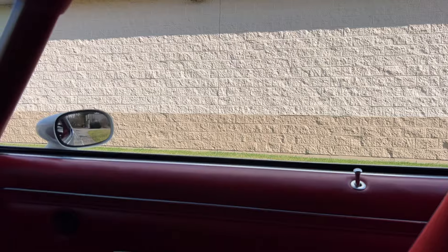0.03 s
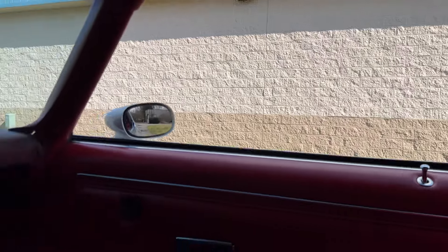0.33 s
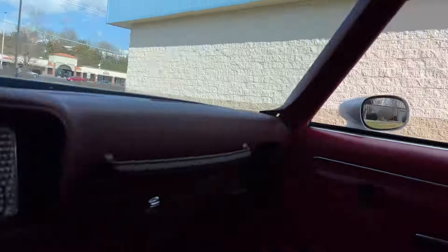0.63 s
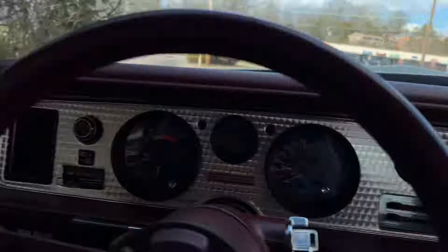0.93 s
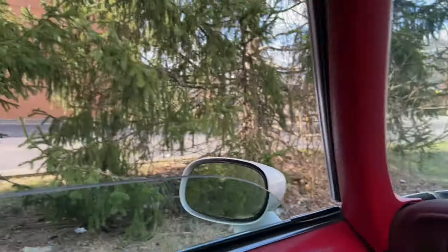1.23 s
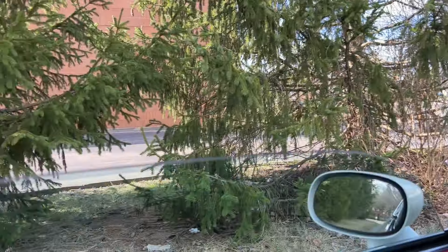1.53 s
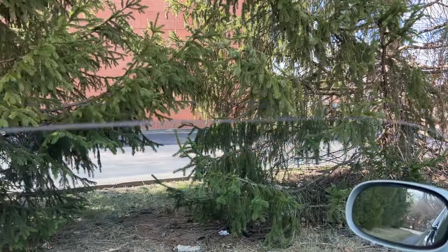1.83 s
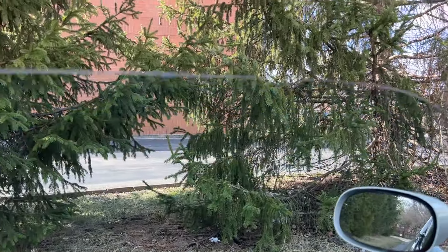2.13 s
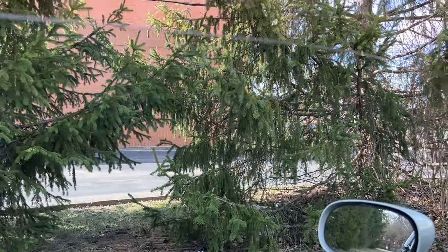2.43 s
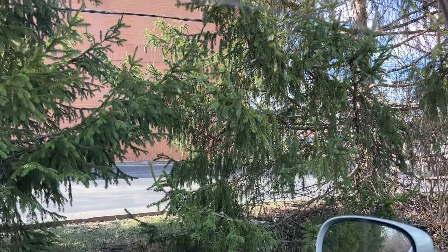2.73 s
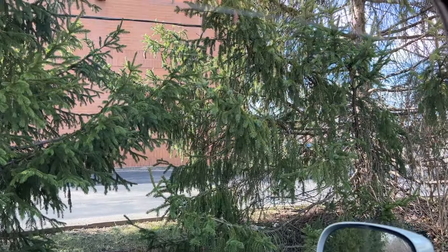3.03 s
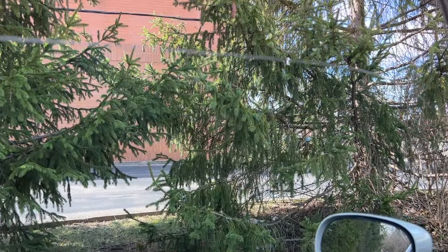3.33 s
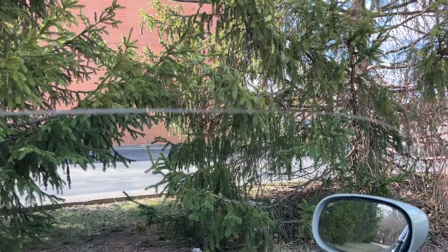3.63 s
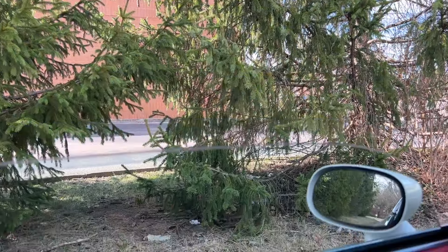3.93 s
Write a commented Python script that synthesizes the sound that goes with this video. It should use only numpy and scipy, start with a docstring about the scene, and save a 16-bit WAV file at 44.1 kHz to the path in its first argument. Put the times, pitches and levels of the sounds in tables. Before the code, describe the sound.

A car's power window motor whirrs twice, with a switch clack and rumbling engine idle.

```python
"""A V8 idles with a lumpy burble, heard inside the parked car. A window motor stops, a sleeve rustles, a switch
clicks and the motor whirrs the glass up, slowing under load. After a pause the switch clacks and the glass runs
down. The firings boom in the cabin and shake the trim; motor hum and gear rasp ring through the door; the glass
hisses in its felt channel and thin tones glide, the motor's whine swelling among them."""
import sys
import numpy as np
from scipy import signal
from scipy.fft import rfft, irfft, next_fast_len
from scipy.io import wavfile
from scipy.ndimage import map_coordinates

SR = 44100
rng = np.random.default_rng(int(sys.argv[2]) if len(sys.argv) > 2 else 0)


def wav_record(signal):
    """Record a signal, one row per channel, as 16-bit PCM in the file named by sys.argv[1]."""
    frames = np.transpose(np.atleast_2d(signal))
    bounded = np.clip(frames, -1, 1)
    # unit amplitude maps onto the largest positive 16-bit level
    quanta = np.round(bounded * 32767).astype(np.int16)
    wavfile.write(sys.argv[1], SR, quanta)


N = 176400
CYLINDERS = 8


def amp(db):
    """Decibels to gain."""
    return 10 ** (np.asarray(db) / 20)


def unit(x):
    """Scale to rms 1."""
    return x / np.sqrt(np.mean(x ** 2) + 1e-20)


def clock():
    """Sample times in seconds."""
    return np.arange(N) / SR


def curve(rows):
    """(s, value) points joined by lines."""
    return np.interp(clock(), *np.transpose(rows))


def along(points, hz):
    """(Hz, value) points joined on a log axis."""
    knots_hz, values = np.transpose(points)
    return np.interp(np.log(hz + 1), np.log(knots_hz + 1), values)


def wobble(rate_hz):
    """Smooth random curve, rate_hz knots a second."""
    return map_coordinates(rng.standard_normal(int(N * rate_hz / SR) + 4), [clock() * rate_hz])


def filtered(x, response):
    """Apply a gain given as a function of Hz."""
    size = next_fast_len(N + SR // 4)
    return irfft(rfft(x, size) * response(np.fft.rfftfreq(size, 1 / SR)), size)[..., :N]


def pan(db):
    """Stereo gains, left louder by db."""
    return amp(np.array([[db], [-db]]) / 2)


def spread(pair, colour):
    """Two unrelated signals, coloured (dB of Hz) and blended to cabin stereo of rms 1."""
    # Each row: frequency in Hz, left-right correlation.
    likeness = [(100, 0.1), (250, 0.74), (500, 0.38), (1500, 0.15), (4000, 0.15), (8000, 0.1), (12000, 0)]
    angle = lambda hz: np.arccos(np.clip(along(likeness, hz), -1, 1)) / 2
    mid, side = filtered(pair, lambda hz: amp(colour(hz)) * [np.cos(angle(hz)), np.sin(angle(hz))])
    return unit(np.array([mid + side, mid - side]))


def hiss(t60_s=.09):
    """Stereo noise: part diffuse, part one source through short cabin reflections."""
    echoes = rng.standard_normal((2, SR // 10)) * amp(-60 * np.arange(SR // 10) / SR / t60_s)
    reflected = signal.fftconvolve(rng.standard_normal((1, N)), echoes, axes=1)[:, :N]
    return unit(reflected) + rng.standard_normal((2, N))


def noise(spectrum):
    """Stereo noise of rms 1, shaped by (Hz, dB) points."""
    return spread(hiss(), lambda hz: along(spectrum, hz))


def partials(turns, orders, wander, rate_hz, lag_turns=0, depth_db=0, smear_rad=0):
    """Harmonics of a rotation, drifting in level and phase; their joint swell comes lag_turns late."""
    middle = round(orders[len(orders) // 2 - 1][0])
    out = 0
    for order, db in orders:
        away = round(order) - middle
        phase = 2 * np.pi * (round(order) * turns - away * lag_turns) + smear_rad * away ** 2
        phase += wander * wobble(rate_hz)
        gain = amp(db + depth_db * (away != 0)) * (1 + wander * wobble(rate_hz) / 2)
        out = out + gain * np.cos(phase)
    return np.sqrt(2) * out


def cabin_air(level_db=-29):
    """Steady cabin air and engine hiss."""
    # Each row: frequency in Hz, relative density in dB.
    spectrum = [(20, -6), (45, -2), (100, 10), (200, -3), (400, -18.5), (700, -23.5), (1200, -30.5),
                (2500, -37), (3600, -45.5), (7000, -47), (9000, -55), (15000, -70.5)]
    return amp(level_db) * noise(spectrum) * pan(2)


def exhaust_boom(cycles):
    """The exhaust booms in the cabin, strongest at the firing rate."""
    # Each row: time in seconds, level in dB.
    levels = [(0.03, -11.5), (1.64, -13.5), (1.68, -15.5), (1.73, -13), (2.56, -13.5), (3.32, -17),
              (3.42, -14), (3.56, -18.5), (3.62, -13), (3.97, -14.5)]
    # Each row: multiple of the cycle rate, relative level in dB.
    orders = [(5, -35.5), (6, -24), (7, -8), (8, 9), (9, -22), (10, -30.5), (11, -8), (12, -30),
              (13, -19.5), (14, -47), (15, -32), (16, -5.5)]
    return unit(partials(cycles, orders, wander=.031, rate_hz=9.6)) * amp(curve(levels)) * pan(-1.3)


def exhaust_burble(cycles):
    """Uneven exhaust beats swell once a cycle; unequal delays of the partials smear them."""
    # Each row: time in seconds, level in dB, place of the swell in cycles, swell depth in dB.
    swells = [(0, -23, 0, -2.5), (.7, -26.5, 0.4, 0.5), (1.25, -17.5, 0.03, 1.5), (1.8, -15, 0.11, 0),
              (2.15, -20.5, .11, 2.5), (2.75, -17, .06, -0.5), (3.15, -18, 0, -8.5), (3.55, -19, .05, -0.5),
              (3.85, -15, 0.07, -1)]
    # Each row: multiple of the cycle rate, relative level in dB.
    orders = [(18, -15), (19, 3), (20, 1), (21, 7), (22, -15), (23, -12)]
    level_db, lag_turns, depth_db = (curve(np.array(swells)[:, [0, column]]) for column in (1, 2, 3))
    beats = partials(cycles, orders, wander=.51, rate_hz=6.1,
                     lag_turns=lag_turns, depth_db=depth_db, smear_rad=.32)
    return unit(beats) * amp(level_db)


def trim_rattle(firings, scatter=.58, roughness=.93, decay_s=.05):
    """Each firing kicks the trim into ringing, each cylinder with its own strength."""
    # Each row: time in seconds, level in dB.
    levels = [(0, -30.5), (.75, -31.5), (1.1, -30), (2, -29), (2.7, -32.5), (3.4, -32.5), (4, -31)]
    # Each row: frequency in Hz, relative density in dB.
    spectrum = [(60, -39.5), (150, -2), (203, 0), (226, -9), (262, -4), (285, -6), (308, -2), (365, -16),
                (430, -18), (520, -30.5), (615, -28.5), (695, -18.5), (740, -40), (790, -22.5),
                (860, -41.5), (2000, -67)]
    onsets = np.flatnonzero(np.diff(np.floor(firings)))
    strengths = rng.standard_normal((CYLINDERS, 2))[np.arange(len(onsets)) % CYLINDERS]
    kicks = np.zeros((2, N))
    kicks[:, onsets] = (strengths + scatter * rng.standard_normal((len(onsets), 2))).T
    ringing = rng.standard_normal((1, SR // 5)) * np.exp(-np.arange(SR // 5) / SR / decay_s)
    shaken = unit(signal.fftconvolve(kicks, ringing, axes=1)[:, :N]) + roughness * unit(hiss())
    return spread(shaken, lambda hz: along(spectrum, hz)) * amp(curve(levels))


def engine(first_firing_s=.0051):
    """Idling V8: eight firings a cycle drive exhaust and trim."""
    # Each row: time in seconds, firing rate in Hz.
    idle = [(0.0, 58.81), (0.7, 59.58), (0.95, 58.39), (1.6, 58.53), (2.1, 57.27), (2.7, 58.21),
            (3.05, 60.76), (3.5, 59.89), (4.0, 58.25)]
    firings = np.cumsum(curve(idle)) / SR - first_firing_s * idle[0][1]
    cycles = firings / CYLINDERS
    return exhaust_boom(cycles) + exhaust_burble(cycles) + trim_rattle(firings)


def sleeve(grain_db=.5):
    """A hand reaching for the switch rubs the hollow trim; the sleeve swishes above it."""
    # Each row: centre in seconds, Gaussian width in seconds, rub level in dB, swish level in dB.
    brushes = [(0.601, 0.018, -41.5, -53.5), (.648, 0.019, -39, -49.5), (.708, 0.013, -39, -48.5),
               (0.741, .016, -40.5, -55.5), (0.882, .1, -52, -53.5), (3.066, 0.023, -39, -57.5),
               (3.113, .012, -38, -46.5), (3.142, 0.016, -34.5, -52.5)]
    # Each row of both: frequency in Hz, relative density in dB.
    rub_spectrum = [(150, -6), (300, 3.5), (470, 2), (620, -7), (760, -2), (900, -4), (1600, -10),
                    (2400, -20.5), (5000, -39.5), (15000, -66.5)]
    swish_spectrum = [(500, -10), (1500, 2), (2800, 0), (4500, -9), (8000, -12.5), (10000, -30),
                      (15000, -30)]
    rub_gain, swish_gain = sum(np.outer(amp(db), np.exp(-.5 * ((clock() - centre_s) / width_s) ** 2))
                               for centre_s, width_s, *db in brushes)
    rub = rub_gain * unit(noise(rub_spectrum) * amp(grain_db * wobble(200)))
    swish = swish_gain * unit(noise(swish_spectrum) * amp(grain_db * wobble(400)))
    return (rub + swish) * pan(2.5)


def clicks(rise_s=.00022, skirt_db=30):
    """Switch clicks and gear knocks: bursts of rattle that die fast in the padded cabin."""
    # Each row: start in seconds, level in dB, centre in Hz, width in octaves, T60 in seconds.
    hits = [(0.696, -57, 2800, 0.93, 0.049), (0.937, -38.5, 5720, .65, 0.019),
            (1.485, -47.5, 5030, 0.72, .02), (2.715, -46.5, 3500, 1.1, 0.019),
            (2.7588, -42, 2600, 1.5, 0.015), (3.062, -40, 1870, 0.32, .03), (3.0638, -48, 6320, .5, .014),
            (3.1588, -33, 3900, .7, 0.068), (3.16, -28, 1215, 1.6, 0.057), (3.17, -25.5, 695, 1.4, 0.031),
            (3.165, -34, 1725, 0.11, 0.15), (3.184, -19.5, 478, 1.17, 0.062),
            (3.184, -44.5, 4960, 0.72, 0.055), (3.2094, -46.5, 13250, 0.23, 0.033),
            (3.2094, -40, 5610, 0.74, 0.033)]
    out = np.zeros((2, N))
    for start_s, db, centre_hz, octaves, t60_s in hits:
        age_s = np.maximum(clock() - start_s, 0)
        band_db = lambda hz: -skirt_db * np.log10(1 + (np.log2((hz + 1) / centre_hz) / octaves) ** 4)
        burst = spread(rng.standard_normal((2, N)), band_db)
        out += burst * amp(db - 60 * age_s / t60_s) * (1 - np.exp(-age_s / rise_s))
    return out * pan(-.5)


def gliding_whistles(rough_rad_per_hz=.00035, flutter_db=1.1):
    """Thin tones sing in short, rough glides while the motor runs; those near 3.1-3.5 kHz are the motor's
    seventh slot harmonic swelling through the door's resonances."""
    # Each row: start in seconds, length in seconds, first and last pitch in Hz, level in dB.
    glides = [(.9, .08, 1605, 1598, -56), (.94, .2, 3350, 3310, -58), (1.09, .31, 3465, 3420, -62),
              (1.41, .16, 3250, 3215, -62), (1.58, .3, 3135, 3060, -63), (1.24, .31, 1602, 1602, -53),
              (1.1, .3, 8280, 8380, -68), (3.28, .28, 7880, 7910, -64), (3.52, .24, 5150, 4620, -64),
              (3.73, .18, 3080, 3180, -61)]
    out = np.zeros(N)
    for start_s, length_s, from_hz, to_hz, db in glides:
        progress = np.clip((clock() - start_s) / length_s, 0, 1)
        phase = 2 * np.pi * np.cumsum(from_hz + (to_hz - from_hz) * progress) / SR
        phase += rough_rad_per_hz * from_hz * wobble(110) + wobble(45)
        envelope = amp(db) * np.sqrt(2 * np.abs(np.sin(np.pi * progress)))
        out += envelope * np.sin(phase) * amp(flutter_db * wobble(30))
    return out


def felt_hiss():
    """Glass sliding in its felt channel."""
    # Each row: frequency in Hz, relative density in dB.
    spectrum = [(1000, -21.5), (3500, 7), (6000, -10), (8400, 6), (9800, -19), (12000, -3.5), (14500, -7),
                (15700, -21.5)]
    # Each row: time in seconds, base level in dB.
    levels = [(0, -62), (.95, -51.5), (1.3, -56.5), (1.7, -62), (2.5, -62.5), (2.72, -65.5), (3.3, -60.5),
              (4, -60)]
    return noise(spectrum) * amp(curve(levels))


def door_lift_db(hz, way):
    """Boost from the door's resonances; way 0 is glass going up, 1 down."""
    # Each row: centre in Hz, width in Hz, boost going up in dB, boost going down in dB.
    modes = [(432, 14, 8.6, 2), (672, 17, 8.1, 10.5), (787, 18, 9, -1), (965, 55, 11, 8.5),
             (1000, 33, 5.6, 2.5), (1115, 50, 1.1, 3.5), (1186, 45, 7, 6.5), (1390, 55, 2, 5.5),
             (1714, 20, 10, 12), (1890, 52, 3.3, 10.5), (2200, 44, 4.6, 4.5), (2557, 120, 7.4, 11.5),
             (3270, 120, 5.6, 7.5), (5160, 380, 4.8, 5), (7330, 90, 2, 3)]
    return sum(db[way] / (1 + (2 * (hz - centre_hz) / width_hz) ** 2)
               for centre_hz, width_hz, *db in modes)


def gear_rasp(turns, slots, slot_depth=.29, shaft_depth=.084, grit_db=.5):
    """Gear noise through the door, pulsing per slot and per turn. Returns up, down."""
    # Each row: frequency in Hz, relative density in dB.
    spectrum = [(150, -12.5), (400, 3.5), (800, -4.5), (1150, -4.5), (1500, -7.5), (2200, -9.5),
                (2900, -17.5), (4200, -20), (6500, -20.5), (8500, -27), (10000, -44.5), (15000, -39.5)]
    slot_pulse = 1 + slot_depth * np.cos(2 * np.pi * slots * turns)
    shaft_pulse = 1 + shaft_depth * np.cos(2 * np.pi * turns)
    rasp = slot_pulse * shaft_pulse * amp(grit_db * wobble(150)) * hiss()
    return [spread(rasp, lambda hz: along(spectrum, hz) + door_lift_db(hz, way)) for way in (0, 1)]


def motor_hum(turns, slots, door_share=.57):
    """Slot-rate harmonics, lifted as they glide across the door's resonances. Returns up, down."""
    # Each row: multiple of the slot rate, base level in dB.
    orders = [(1, -50.5), (2, -59), (3, -61), (4, -62), (5, -66.5), (6, -67), (7, -70)]
    hum = np.array([partials(slots * turns, orders, wander=.32, rate_hz=38) for side in range(2)])
    return [filtered(hum, lambda hz: amp(door_share * door_lift_db(hz, way))) for way in (0, 1)]


def window(slots=6, fade_s=.026, lowering_gain=.68):
    """The motor drives the glass in three runs: the end of one, then up, then down."""
    # Each row: time in seconds, motor speed in revolutions per second.
    speed = [(0, 70), (.92, 80), (1.03, 78.8), (1.13, 82.3), (1.24, 82.4), (1.35, 81), (1.46, 77.3),
             (1.56, 76.6), (1.66, 74.2), (1.85, 73), (2.2, 72.5), (2.45, 70.5), (2.72, 70.5), (3.2, 72),
             (3.35, 73), (3.7, 73), (3.87, 75.3), (4, 76)]
    # Each row: start, end and fade-in in seconds, base gear level in dB, felt gain in dB.
    runs = [(-.2, .04, .05, -46, 3.5), (0.922, 2.735, 0.39, -41.5, 0.5), (3.154, 4.2, 0.054, -42.5, -0.5)]
    # Door nearing and leaving the listener. Each row: time in seconds, gain in dB.
    nearness = [(0, 7), (1.0, 2.5), (1.15, -1), (1.33, 1), (1.45, -2), (1.8, -1.5), (2.3, -2.5),
                (2.7, -2.5), (3.25, -0.5), (3.7, 1), (4, 0.5)]
    t = clock()
    turns = np.cumsum(curve(speed)) / SR
    gates, gear_gains, felt_gain = [], [], 0
    for start_s, end_s, rise_s, gear_db, felt_db in runs:
        gate = np.clip((t - start_s) / rise_s, 0, 1) ** .5 * np.exp(-np.maximum(t - end_s, 0) / fade_s)
        gates.append(gate)
        gear_gains.append(gate * amp(gear_db))
        felt_gain += gate * amp(felt_db)
    rasp_up, rasp_down = gear_rasp(turns, slots)
    gears = rasp_up * (gear_gains[0] + gear_gains[1]) + rasp_down * gear_gains[2]
    hum_up, hum_down = motor_hum(turns, slots)
    hum = hum_up * gates[1] + lowering_gain * hum_down * gates[2]  # less load going down
    drive = (gears + hum) * amp(curve(nearness))
    return felt_hiss() * felt_gain + (drive + gliding_whistles()) * pan(3.5)


def scene():
    """The mix at the driver's seat."""
    return engine() + cabin_air() + window() + sleeve() + clicks()


def record(dry, top_hz=15700):
    """Brick-wall low-pass."""
    return filtered(dry, lambda hz: hz < top_hz)


dry = scene()
out = record(dry)
wav_record(out)
```